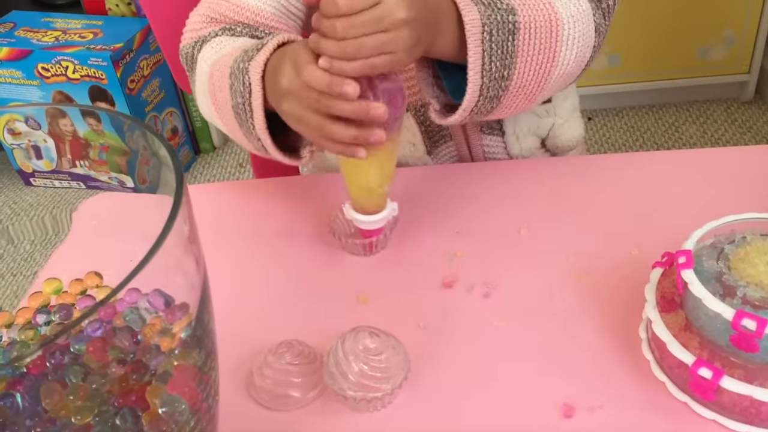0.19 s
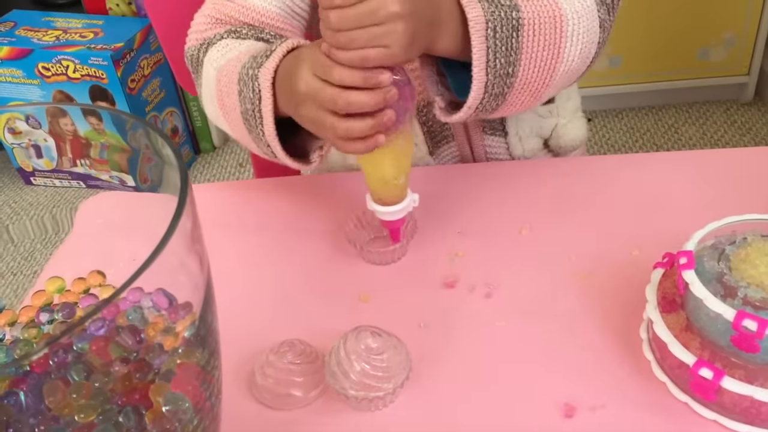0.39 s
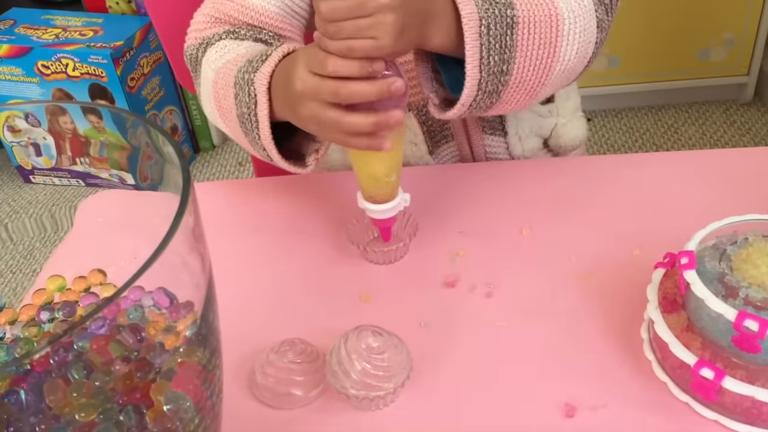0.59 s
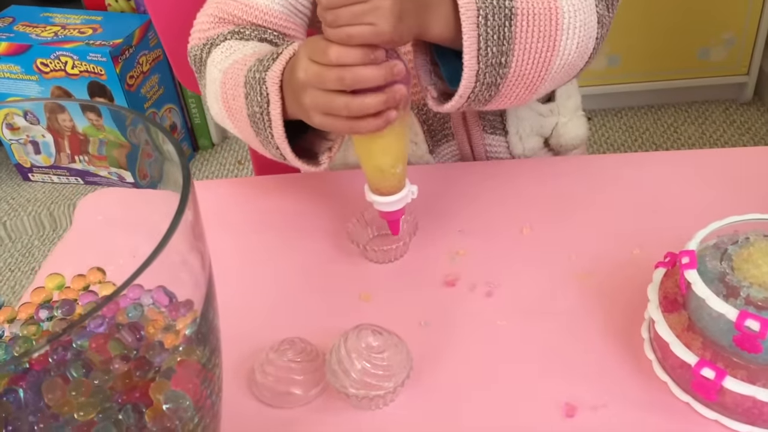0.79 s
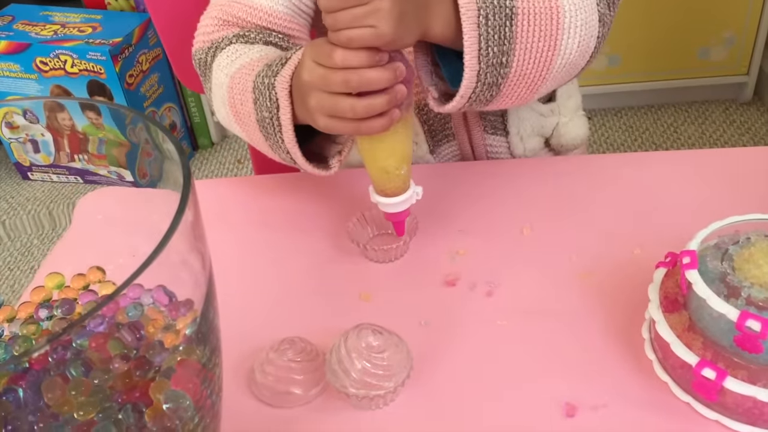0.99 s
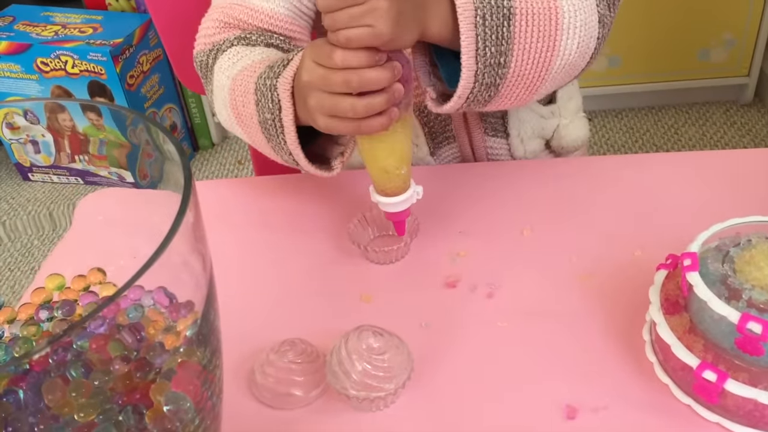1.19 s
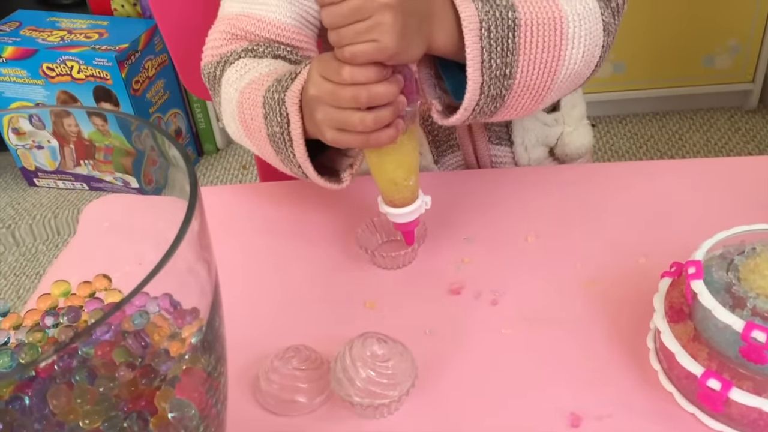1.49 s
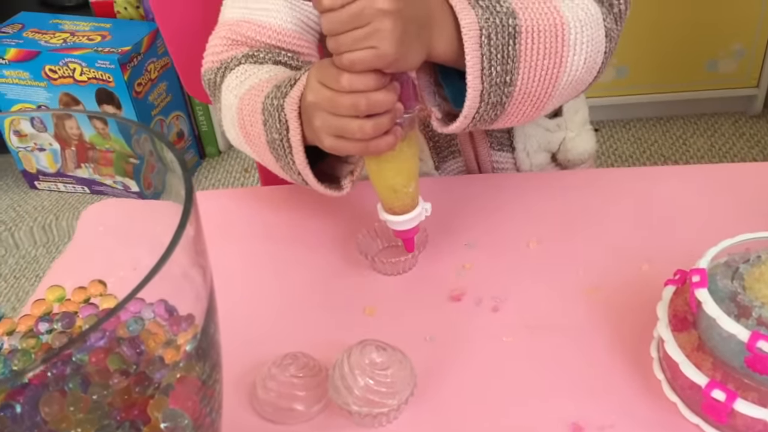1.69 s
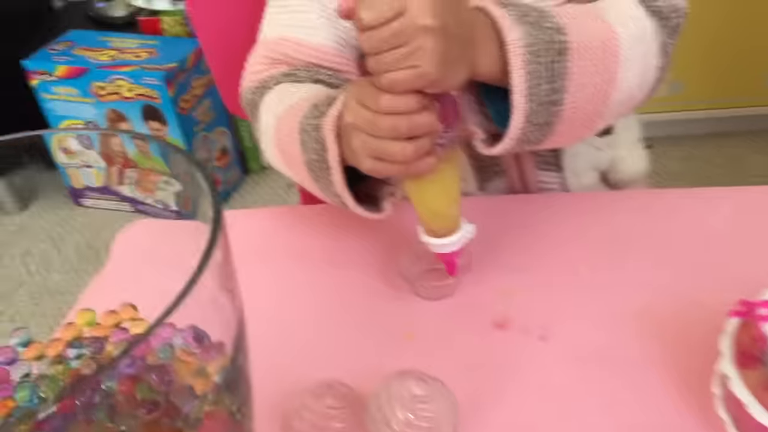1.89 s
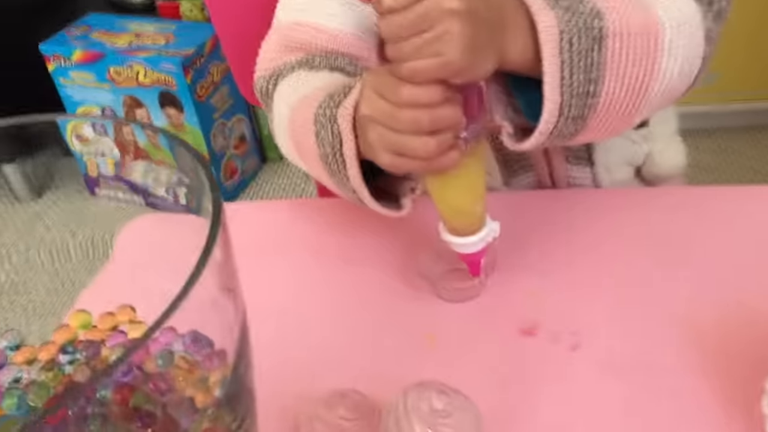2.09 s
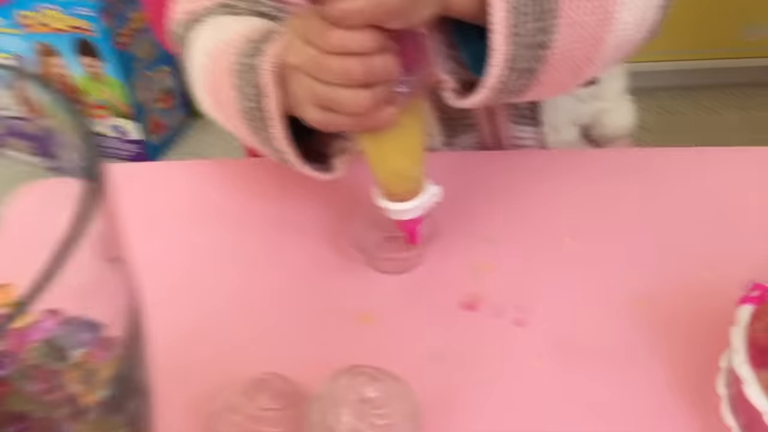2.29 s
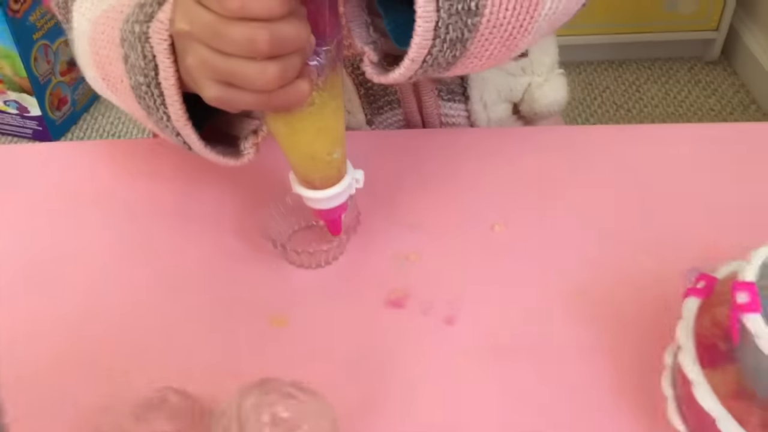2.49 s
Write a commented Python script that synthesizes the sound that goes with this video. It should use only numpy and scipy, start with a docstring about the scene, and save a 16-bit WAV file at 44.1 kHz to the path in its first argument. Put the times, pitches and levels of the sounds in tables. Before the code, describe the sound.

A light table takes one sharp knock after small plastic clicks, then a thin plastic mould taps and rattles

```python
"""A plastic piping bag ticks in the hands, then its hard nozzle clicks and one knock shakes a light table.
A thin plastic mould is tapped and rattles; soft low thumps and rubbing follow over microphone hiss.
Struck parts are damped sine modes with noise cracks; thumps are sagging sines.
Rumble, rubbing and hiss are coloured noise. A small quiet room answers all but thumps, rumble and hiss."""
import sys
import numpy as np
from scipy import signal
from scipy.fft import rfft, irfft, next_fast_len
from scipy.io import wavfile
from scipy.ndimage import map_coordinates

SR = 44100
rng = np.random.default_rng(int(sys.argv[2]) if len(sys.argv) > 2 else 0)


def wrap_up_sound(samples):
    """Save the sound to the file named by the first command line argument, as 16-bit audio."""
    columns = np.atleast_2d(samples).T
    # keep every value between -1 and 1, then stretch to whole-number steps
    tamed = np.clip(columns, -1, 1)
    steps = np.round(tamed * 32767).astype(np.int16)
    wavfile.write(sys.argv[1], SR, steps)


N = 114660  # samples


def amp(db):
    """Decibels to gain."""
    return 10 ** (np.asarray(db) / 20)


def unit(x):
    """Scales to rms 1."""
    return x / np.sqrt(np.mean(x ** 2) + 1e-20)


def along(points, hz):
    """Interpolates (Hz, value) points on a log frequency axis."""
    point_hz, value = np.transpose(points)
    return np.interp(np.log(hz + 1), np.log(point_hz + 1), value)


def curve(rows):
    """Turns (s, dB) rows into a gain for each sample."""
    s, db = np.transpose(rows)
    return amp(np.interp(np.arange(N) / SR, s, db))


def filtered(x, response):
    """Multiplies the spectrum of x by a response of frequency."""
    padded = next_fast_len(N + SR // 2)
    hz = np.fft.rfftfreq(padded, 1 / SR)
    return irfft(rfft(x, padded) * response(hz), padded)[..., :N]


def noise(spectrum):
    """Colours white noise by (Hz, dB) points, at rms 1."""
    return unit(filtered(rng.standard_normal(N), lambda hz: amp(along(spectrum, hz))))


def lumps(rate_hz, length):
    """Smooth random wander through rate_hz normal draws per second."""
    draws = rng.standard_normal(int(length * rate_hz / SR) + 10)
    return map_coordinates(draws, [np.arange(length) * rate_hz / SR])


def add(track, s, db, sound):
    """Mixes a sound into the track from s, with its peak at db."""
    part = track[max(round(s * SR), 0):][:len(sound)]
    part += amp(db) * sound[:len(part)] / np.abs(sound).max()


MODE_SCATTER_DB, MODE_DETUNE = 2, 0.012  # standard deviations; detune as a share of pitch


def ring(modes, rise_s=0.00044):
    """Damped sine modes (Hz, dB, t60 s), with balance and pitch varied at each blow."""
    t = np.arange(SR // 4) / SR
    total = np.zeros(len(t))
    for hz, db, t60_s in modes:
        level_db = db + MODE_SCATTER_DB * rng.normal()
        pitch_hz = hz * (1 + MODE_DETUNE * rng.normal())
        total += amp(level_db - 60 * t / t60_s) * np.sin(2 * np.pi * pitch_hz * t)
    return (1 - np.exp(-t / rise_s)) ** 2 * total


def tilted(modes, tilt_db_per_octave, pivot_hz):
    """Tilts mode levels about a pivot: a brighter or duller blow."""
    return [(hz, db + tilt_db_per_octave * np.log2(hz / pivot_hz), t60_s) for hz, db, t60_s in modes]


CRACK_SPIKE = 1.57  # one sample added to unit-rms noise, before the band shaping


def crack(hz, t60_s, narrow=3.1, rise_s=0.00031):
    """A sharp break in a decaying noise burst, band-shaped around hz."""
    t = np.arange(SR // 4) / SR
    burst = rng.standard_normal(len(t)) * (1 - np.exp(-t / rise_s)) ** 2 * amp(-60 * t / t60_s)
    burst[round(rise_s * SR) + 8] += CRACK_SPIKE
    ratio = np.fft.rfftfreq(len(t), 1 / SR) / hz
    shaped = irfft(rfft(burst) * (ratio / (1 + ratio ** 2)) ** narrow, len(t))
    return shaped * np.minimum(20 * (1 - t / t[-1]), 1)  # end fade


# Faint ticks of bag and beads. Each row: time in seconds, tone peak in dB, pitch in Hz.
BAG_TICKS = [(.0033, -46.5, 5640), (.0078, -51, 5700), (0.017, -48.5, 5250), (0.043, -50, 5930),
             (0.049, -45, 5500), (.0543, -51.5, 4830), (0.0546, -51.5, 2490), (0.228, -39, 2250),
             (0.898, -46.5, 1640), (0.9546, -51.5, 1560), (1.5382, -42, 1910), (1.853, -55.5, 1170),
             (2.491, -56, 13600), (2.551, -56.5, 6160)]
TICK_T60_S, TICK_LEAD_S = 0.016, 0.0008


def ticks():
    """Tiny blips, each a close pair of damped tones in a narrow crackle at its pitch."""
    out = np.zeros(N)
    for s, db, hz in BAG_TICKS:
        pair = [(hz, 0, TICK_T60_S), (hz * 1.095, -3, TICK_T60_S)]
        add(out, s - TICK_LEAD_S, db, ring(pair, rise_s=0.00033))
        add(out, s - TICK_LEAD_S, db - 1, crack(hz, 0.012, narrow=9))
    return out


# Short broad snaps: bag crinkles and the noisy cracks within clicks and the knock.
# Each row: start in seconds, peak in dB, centre in Hz, t60 in seconds, narrowness (exponent).
SHORT_SNAPS = [(0.2468, -15, 2230, 0.0051, 2.44), (.254, -30, 1970, 0.036, 3.6),
               (.2925, -51, 12000, 0.0073, 3), (0.3146, -35.5, 6100, 0.01, 16),
               (0.4262, -37.5, 2080, 0.0082, 3.7), (0.56, -40, 6070, 0.0089, 1.1),
               (0.9536, -44.5, 3950, 0.0063, 3), (1.5373, -28.5, 5000, 0.0012, 3.2),
               (1.5379, -30.5, 5800, .0045, 3.6), (1.5585, -56, 12000, 0.0044, 3),
               (1.831, -48.5, 10000, 0.01, 2.5), (2.086, -48.5, 5000, 0.0082, 1.7)]


def snaps():
    """Short, sharp cracks: a break and a noise burst in one band."""
    out = np.zeros(N)
    for s, db, hz, t60_s, narrow in SHORT_SNAPS:
        add(out, s, db, crack(hz, t60_s, narrow))
    return out


# Hard clicks. Each row: start in seconds, bright ring peak in dB, dull body peak in dB.
NOZZLE_CLICKS = [(0.1662, -28, -27.5), (.222, -32.5, -30.5), (0.247, -35, -23.5), (0.283, -33, -39),
                 (0.3149, -30.5, -36), (0.4266, -46.5, -42.5)]
# Modes of the stiff tip. Each row: pitch in Hz, relative level in dB, t60 in seconds.
TIP_MODES = [(7040, 4, 0.0075), (9020, 3, 0.009), (10050, 7, 0.0055), (11500, 1, 0.0053),
             (12400, -5, 0.0047), (13700, -3, 0.0043)]
# Modes of the collar. Each row: pitch in Hz, relative level in dB, t60 in seconds.
COLLAR_MODES = [(745, -9.5, 0.0069), (1130, -5.5, 0.0064), (1450, 1, 0.007), (1970, 1, 0.006),
                (2450, 2, .006), (2980, 3.5, 0.0065), (3450, 0, 0.006)]


def nozzle():
    """Each click rings the stiff tip, cracks, and thuds in the collar."""
    out = np.zeros(N)
    for s, bright_db, dull_db in NOZZLE_CLICKS:
        add(out, s, bright_db, ring(TIP_MODES, rise_s=0.00033))
        add(out, s, bright_db - 13, crack(11000, 0.015, narrow=6.8))
        add(out, s, dull_db, ring(COLLAR_MODES, rise_s=0.00045))
        add(out, s, dull_db - 5.5, crack(1550, 0.023, narrow=6.9))
    return out


# Taps and rattle. Each row: start in seconds, ring peak in dB, brightness in dB per octave.
MOULD_TAPS = [(0.4999, -18.5, 1.5), (0.5043, -18.5, -6.5), (0.5113, -29, -2), (0.517, -35, -2),
              (0.521, -36, -5), (0.525, -35.5, -2), (0.5305, -39.5, -5), (0.542, -43, -4), (0.554, -46, -7),
              (0.5612, -45, -5)]
# Modes of the thin mould. Each row: pitch in Hz, relative level in dB, t60 in seconds.
MOULD_MODES = [(433, -39, 0.017), (1400, -29, 0.025), (1550, -0.5, 0.0076), (1765, 13.5, 0.0057),
               (2000, 1, 0.006), (2620, -15, 0.0077), (3485, 9, 0.0034), (4060, -13.5, 0.012),
               (5430, 2.5, 0.0059), (5840, -2.5, 0.0047), (11800, -10.5, 0.0053)]


def mould():
    """A tap and its dying rattle: tilted modes of the thin plastic, with a crack."""
    out = np.zeros(N)
    for s, db, tilt_db in MOULD_TAPS:
        add(out, s, db, ring(tilted(MOULD_MODES, tilt_db, pivot_hz=1700), rise_s=0.0019))
        add(out, s, db - 8 + 2 * tilt_db, crack(2640, 0.011, narrow=3))
    return out


# Blows on the table. Each row: start in seconds, peak in dB, contact in seconds.
TABLE_KNOCKS = [(0.227, -32, 0.00034), (0.2471, -19, 0.00014), (0.251, -16.5, 0.00053),
                (0.2542, -16, 0.00057), (0.2561, -24.5, 0.00022), (0.2596, -10.5, 0.0031),
                (0.2662, -21.5, 0.0013), (0.28, -34, 0.0013), (0.346, -39.5, 0.0035)]
# Modes of the top. Each row: pitch in Hz, relative level in dB, t60 in seconds.
TABLE_MODES = [(94, -7, 0.063), (184, -3.5, 0.027), (288.7, 5, 0.035), (421, 4, 0.021), (607, 3.5, 0.02),
               (908, 10, 0.019), (1084, 9, 0.018), (1670, -5, 0.052), (2340, 15, 0.012)]


def table():
    """Modes of the top smoothed by the contact push: longer contact favours the low modes."""
    out = np.zeros(N)
    for s, db, contact_s in TABLE_KNOCKS:
        push = np.hanning(round(contact_s * SR) + 3)
        add(out, s, db, -np.convolve(ring(TABLE_MODES, rise_s=0.0001), push))
    return out


# Rough shudder after the two big blows. Each row: start in seconds, peak in dB, centre in Hz, t60 in seconds.
BLOW_SHUDDERS = [(.252, -36.5, 860, 0.48), (.253, -42, 2020, 0.42), (.506, -42, 3240, 0.16),
                 (.507, -44, 1900, 0.27)]
GRAIN_DB, GRAIN_RATE_HZ = 3, 250


def shudders():
    """Slower noise cracks with a fast random grain in level."""
    out = np.zeros(N)
    for s, db, hz, t60_s in BLOW_SHUDDERS:
        sound = crack(hz, t60_s, rise_s=0.0017)
        add(out, s, db, sound * amp(GRAIN_DB * lumps(GRAIN_RATE_HZ, len(sound))))
    return out


# Finger knocks on the microphone's case. Each row: start in seconds, ring peak in dB,
# brightness in dB per octave, grit peak in dB.
CASE_KNOCKS = [(2.3542, -34, -2, -66), (2.3578, -38, -3, -69), (2.421, -52, 4, -49),
               (2.4285, -29, 2, -48.5), (2.4318, -33, 1.5, -52)]
# Modes of the case. Each row: pitch in Hz, relative level in dB, t60 in seconds.
CASE_MODES = [(224, -2, 0.016), (718, 2, .022), (900, -4, 0.012), (1191, 0.5, 0.018), (1757, -9.5, 0.016),
              (2050, -5, .014), (2824, -7, 0.011), (3270, -1.5, 0.0087), (4160, -9.5, .008)]


def grips():
    """Knocks straight through the case: tilted modes and a gritty crack."""
    out = np.zeros(N)
    for s, db, tilt_db, grit_db in CASE_KNOCKS:
        add(out, s, db, ring(tilted(CASE_MODES, tilt_db, pivot_hz=1000), rise_s=0.0016))
        add(out, s, grit_db, crack(5900, 0.034))
    return out


# Fingers rubbing the case. Each row: time in seconds, rms level in dB before the lumps.
RUB_LEVEL = [(1.7, -79), (1.8, -66.5), (2.02, -68.5), (2.16, -80.5), (2.36, -64.5), (2.5, -79)]
# Colour of the rubbing. Each row: frequency in Hz, relative density in dB per Hz.
RUB_SPECTRUM = [(120, -25), (380, -1), (700, -15.5), (1250, -10.5), (2600, -25.5)]
RUB_LUMPS_DB, RUB_LUMPS_HZ = 5, 50


def rubbing():
    """Skin friction as coloured noise with a lumpy level."""
    lumpy = amp(RUB_LUMPS_DB * lumps(RUB_LUMPS_HZ, N)) * noise(RUB_SPECTRUM)
    return curve(RUB_LEVEL) * unit(lumpy)


# Soft low thumps. Each row: start in seconds, peak in dB, starting pitch in Hz.
LOW_THUMPS = [(0.1787, -40.5, 407), (0.404, -64, 55), (1.023, -35.5, 95), (1.769, -41, 83.6),
              (1.808, -50, 162), (1.822, -46, 77), (1.854, -52.5, 268), (1.915, -41.5, 70),
              (1.93, -42, 210), (1.983, -53, 152), (2.003, -47, 173), (2.129, -45, 66), (2.219, -52.5, 150),
              (2.242, -49.5, 215), (2.3096, -42, 232), (2.313, -43.5, 78.5), (2.351, -40, 111.5),
              (2.362, -44, 61.7), (2.429, -39, 105), (2.477, -56, 80), (2.53, -52, 75)]
THUMP_T60_CYCLES, THUMP_RISE_CYCLES = 7.2, 0.33  # cycles of the starting pitch
THUMP_SAG_PER_CYCLE = 0.18  # exponential rate of pitch loss


def thumps():
    """Low pushes of a few swings that sag in pitch as they die."""
    out, t = np.zeros(N), np.arange(SR // 5) / SR
    for s, db, hz in LOW_THUMPS:
        cycles = hz * t
        turns = np.log1p(THUMP_SAG_PER_CYCLE * cycles) / THUMP_SAG_PER_CYCLE
        rise = (1 - np.exp(-cycles / THUMP_RISE_CYCLES)) ** 2
        decay = amp(-60 * cycles / THUMP_T60_CYCLES)
        add(out, s, db, rise * decay * np.sin(2 * np.pi * turns))
    return out


# Low rumble. Each row: time in seconds, rms level in dB before the lumps.
RUMBLE_LEVEL = [(0, -60), (.12, -63), (.24, -46.5), (.32, -38.5), (.39, -51), (.49, -61), (.93, -59),
                (1.1, -60.5), (1.64, -62), (1.79, -59.5), (1.93, -52.5), (2.2, -60.5), (2.4, -49.5),
                (2.6, -63.5)]
# Colour of the rumble. Each row: frequency in Hz, relative density in dB per Hz.
RUMBLE_SPECTRUM = [(15, -35), (25, 17.5), (39, 20), (65, 8), (184, 2), (450, -11), (580, -103), (990, -120)]
RUMBLE_LUMPS_DB, RUMBLE_LUMPS_HZ = 1.5, 20


def rumble():
    """Low coloured noise with a slowly uneven level, under the thumps."""
    lumpy = amp(RUMBLE_LUMPS_DB * lumps(RUMBLE_LUMPS_HZ, N)) * noise(RUMBLE_SPECTRUM)
    return curve(RUMBLE_LEVEL) * unit(lumpy)


# Microphone hiss. Each row: time in seconds, rms level in dB.
HISS_GAIN = [(0.0, -64), (0.39, -66), (0.51, -63.5), (0.63, -66), (0.93, -66.5), (2.6, -64.5)]
# Colour of the hiss. Each row: frequency in Hz, relative density in dB per Hz.
HISS_SPECTRUM = [(150, -37), (250, -5), (319, -6.5), (372, -9.5), (500, -11), (626, -10.5), (1230, -13),
                 (1440, -13), (1540, -11), (3360, -14.5), (4920, -17.5), (5750, -16.5), (15700, -25),
                 (16000, -43)]


def hiss():
    """The microphone's own coloured noise at a slowly drifting level."""
    return curve(HISS_GAIN) * noise(HISS_SPECTRUM)


# Decay of the room. Each row: frequency in Hz, t60 in seconds.
ROOM_T60 = [(100, 0.12), (500, 0.24), (2000, 0.24), (5000, 0.16), (12000, 0.2)]
# Colour of the room. Each row: frequency in Hz, relative level in dB.
ROOM_SPECTRUM = [(100, 5), (1000, -1), (3000, -0.5), (7000, -1.5), (12000, -2)]
ROOM_DELAY_S = 0.004


def room(x):
    """Delayed convolution with a noise tail whose frequencies die at their own speeds."""
    hz, t, bins = signal.stft(rng.standard_normal(SR // 2), SR, nperseg=256)
    start_db = along(ROOM_SPECTRUM, hz)[:, None]
    decay_db = 60 * t / along(ROOM_T60, hz)[:, None]
    tail = signal.istft(bins * amp(start_db - decay_db), SR, nperseg=256)[1]
    delayed = np.pad(x, (round(ROOM_DELAY_S * SR), 0))
    return signal.fftconvolve(delayed, tail / np.linalg.norm(tail))[:N]


# Room gain in dB for, in order: ticks, snaps with shudders, nozzle, mould, table, case.
ROOM_GAIN_DB = [-14.5, -14.5, -13, -18, -14.5, -20]


def scene():
    """Struck and rubbed things with their room; thumps, rumble and hiss without it."""
    sources = [ticks(), snaps() + shudders(), nozzle(), mould(), table(), grips() + rubbing()]
    wet = sum(x + amp(db) * room(x) for x, db in zip(sources, ROOM_GAIN_DB))
    return (wet + thumps() + rumble() + hiss())[None]


LOW_CUT_HZ, TOP_HZ = 40, 16500


def record(dry):
    """The microphone drops the deepest bass; nothing is kept above the band limit."""
    def response(hz):
        high_pass = (1j * hz / (LOW_CUT_HZ + 1j * hz)) ** 4
        steeper_cut = 1 / (1 + (LOW_CUT_HZ / (hz + 1)) ** 6)
        return (hz < TOP_HZ) * high_pass * steeper_cut
    return filtered(dry, response)


dry = scene()
out = record(dry)
wrap_up_sound(out)
```